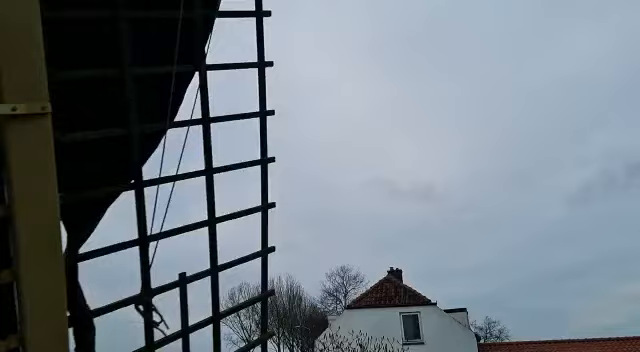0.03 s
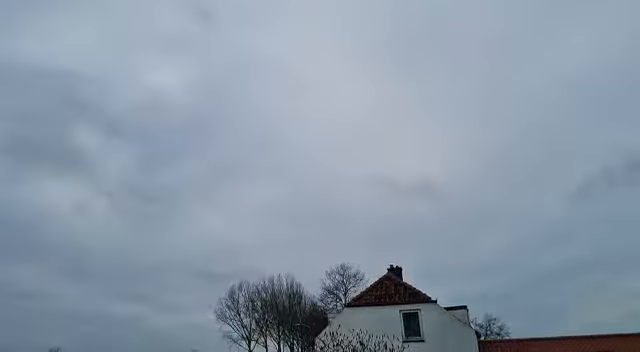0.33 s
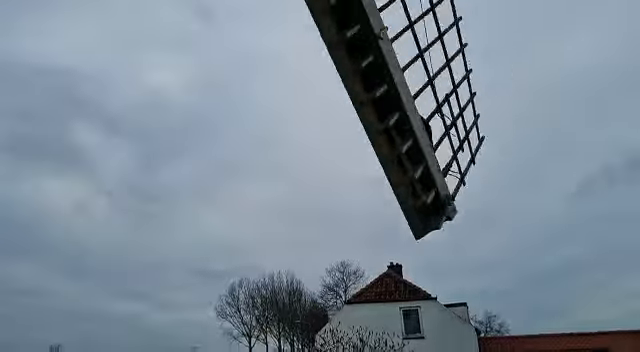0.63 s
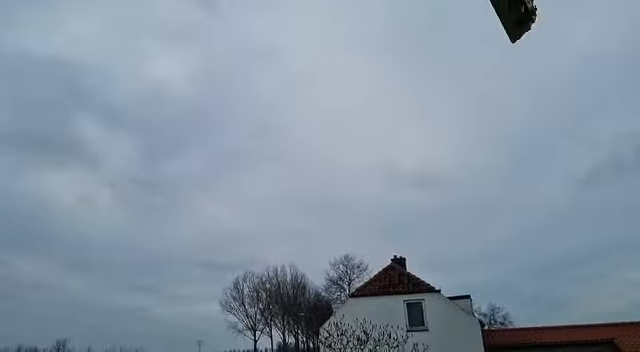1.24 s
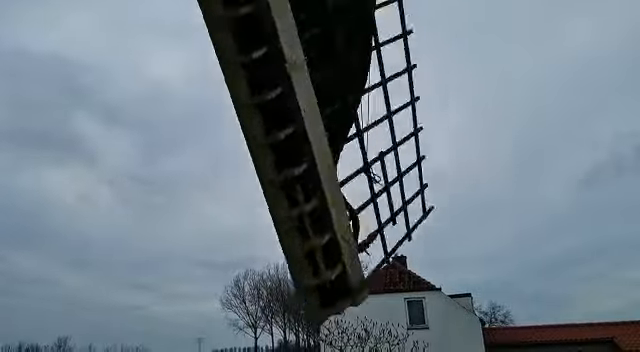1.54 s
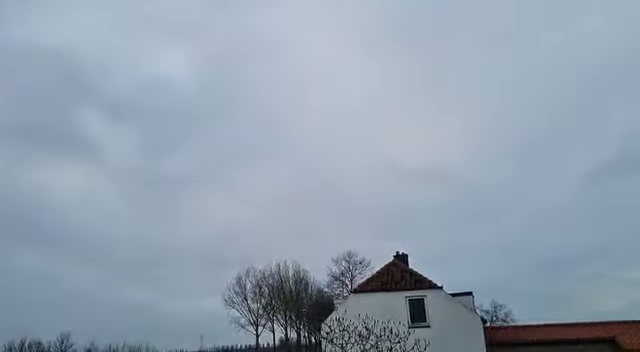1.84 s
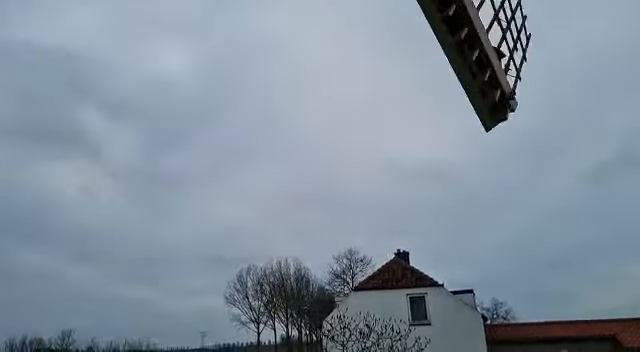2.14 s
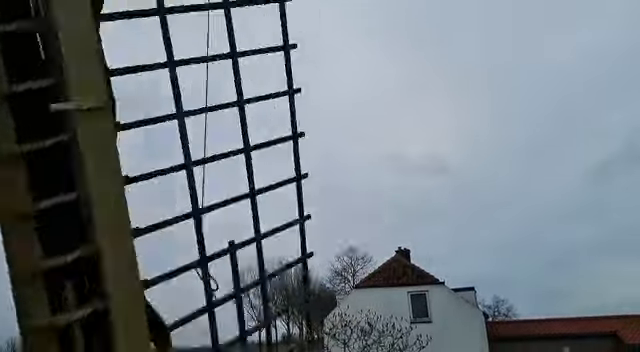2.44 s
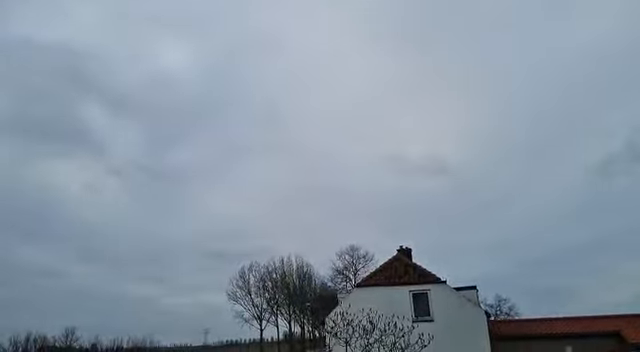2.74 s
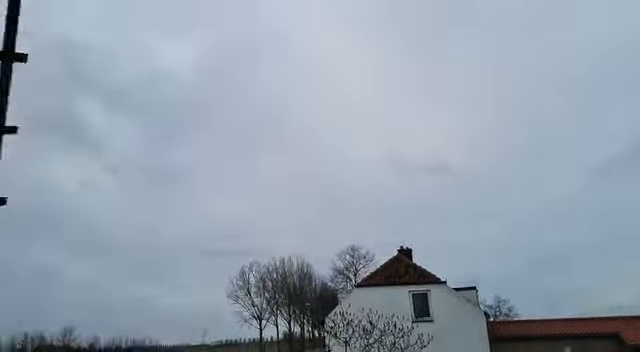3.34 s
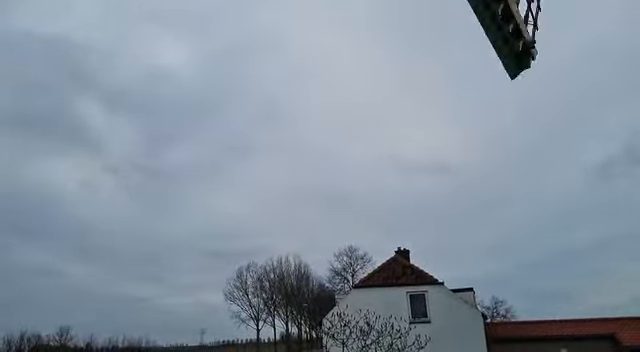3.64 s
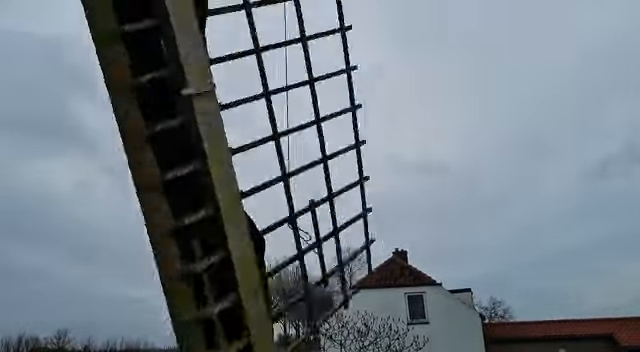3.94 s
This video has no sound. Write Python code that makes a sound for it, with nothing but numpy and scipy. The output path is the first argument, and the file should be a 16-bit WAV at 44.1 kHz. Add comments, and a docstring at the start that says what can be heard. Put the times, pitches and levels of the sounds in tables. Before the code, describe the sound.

After a brief silence, gusty wind hits the microphone at about 0.4 seconds, rumbling and fluttering with soft thumps and a slight crackle. From 1 second, windmill sails swish softly past roughly every 0.8 seconds over a thin hiss. The wind drops around 1.2 to 1.6 seconds, leaving a few faint ticks, then builds again, bumping hardest near 3 seconds and gusting on until 4.

```python
"""After 0.4 s of silence, gusty wind hits two microphone openings (ports) below a turning windmill.
A low rumble and a rough flutter follow the wind. Single swirls of air (eddies) break on the ports
as soft bumps and deep thumps, with a crackle on the hard early ones. From about 1 s, a sail swishes
past roughly every 0.8 s over a thin hiss of open air. A few faint ticks sound as the wind drops;
then it builds again, and bumps hardest around 3 s."""
import sys
import numpy as np
from scipy import signal
from scipy.fft import rfft, irfft
from scipy.io import wavfile
from scipy.ndimage import uniform_filter1d

SR = 44100
rng = np.random.default_rng(int(sys.argv[2]) if len(sys.argv) > 2 else 0)


def put_to_file(sound):
    """Save the sound as 16-bit audio at rate SR, in the file named by the first command-line argument."""
    columns = np.atleast_2d(sound).T  # one column per channel
    safe = np.clip(columns, -1, 1)
    whole_steps = np.round(safe * 32767)
    wavfile.write(sys.argv[1], SR, whole_steps.astype(np.int16))


N = 176400
TIME = np.arange(N) / SR

# Strength of the wind on the ports: t/s, rumble level/dB, flutter level/dB
GUSTS = [(0.45, -34.5, -36.5), (0.62, -28.5, -21.5), (0.8, -30, -45), (1.03, -33.5, -39),
         (1.17, -44.5, -49), (1.5, -50.5, -51.5), (1.72, -34.5, -38), (1.97, -40.5, -45), (2.07, -29, -33),
         (2.3, -31.5, -32), (2.5, -24, -24), (2.75, -30, -34), (3.05, -35, -35.5), (3.3, -29, -28),
         (3.4, -31.5, -34.5), (3.6, -40, -41.5), (3.82, -30.5, -29), (4.0, -27.5, -31)]
# Eddies breaking on the ports: t/s, level/dB, half-length/s, corner f/Hz, pan/dB (left minus right)
EDDY_BUMPS = [(0.468, -23.5, 0.0053, 435, 3.5), (0.509, -28.5, 0.017, 604, 4.5),
              (0.554, -26.5, 0.0068, 535, 13.5), (0.621, -16.5, 0.011, 580, 4.5),
              (0.646, -22.5, 0.005, 540, 0), (0.734, -31.5, 0.015, 580, 16.5),
              (.768, -22.5, 0.0054, 447, -0.5), (0.798, -19.5, .012, 390, 4),
              (0.836, -24.5, .009, 450, 5.5), (0.862, -27.5, 0.0082, 415, 2),
              (0.983, -36.5, 0.014, 533, 11.5), (1.005, -26.5, 0.007, 340, 1.5),
              (1.266, -35, 0.017, 222, 2.5), (1.417, -37.5, 0.018, 240, -0.5),
              (1.582, -35, 0.034, 244, -3.5), (1.736, -26.5, 0.011, 554, 2), (2.051, -32, 0.008, 255, -4),
              (2.095, -26, 0.01, 270, -5.5), (2.145, -25, 0.0085, 265, -1), (2.244, -24.5, 0.0035, 370, 13),
              (2.282, -32.5, 0.018, 667, 13), (2.384, -16, 0.0074, 420, 0), (2.461, -22.5, 0.007, 440, 3),
              (2.473, -15, 0.0068, 285, -2), (2.543, -20, 0.0055, 443, 2), (2.567, -21.5, 0.0085, 390, -1),
              (2.624, -27, 0.015, 330, -4), (2.694, -32.5, 0.0028, 505, 17.5),
              (2.792, -33.5, 0.0036, 480, 18), (2.827, -27.5, 0.004, 440, 5),
              (2.858, -13.5, 0.0073, 310, -1.5), (2.902, -23, 0.0084, 252, 1.5),
              (2.995, -15, 0.0064, 260, -3.5), (3.043, -22.5, 0.0054, 300, 12),
              (3.072, -12.5, 0.0094, 392, -1), (3.116, -14.5, 0.013, 350, 0.5),
              (3.16, -24, 0.016, 353, -2.5), (3.261, -17.5, 0.0052, 380, 2),
              (3.308, -24.5, 0.0054, 454, -5), (3.728, -25, 0.0058, 247, -2),
              (3.801, -26, 0.0051, 516, 13.5), (3.88, -32.5, 0.0061, 550, 15.5)]
# How the ports boost or weaken each frequency: f/Hz, level/dB
PORT_TONE = [(30, -6), (62, 6), (90, -1.5), (130, 1), (190, -3.5), (250, 2), (320, 0.35), (420, 0.77),
             (700, -1.5), (1200, -1.43), (2000, 0), (2800, 0.5), (4500, -7.5), (8500, -11.5)]
# How alike the wind is at the two ports: f/Hz, likeness (1 = the same, 0 = unrelated)
LIKENESS = [(60, -0.15), (200, 0.13), (600, 0.072), (2000, 0.042)]
# Moments when the bass drops out on the left: start t/s, end t/s, level change/dB
BASS_DIPS = [(0.417, 0.578, -29), (0.644, 0.78, -34), (0.796, 0.918, -37), (1.704, 1.807, -55),
             (2.237, 2.472, -31), (2.473, 2.624, -17), (2.67, 2.857, -20), (3.042, 3.168, -10.5),
             (3.786, 3.986, -15.5)]
# Thumps of the largest eddies: t/s, level/dB, pan/dB
DEEP_THUMPS = [(0.612, -17, 5.5), (0.781, -24.5, -16), (1.011, -27, -12), (2.214, -19.5, -5),
               (2.485, -26, -12), (2.64, -26, -4), (2.914, -25, 5), (2.997, -31, 1)]
# Crackle of hard eddies: t/s, level/dB, half-length/s
CRACKLE_BURSTS = [(0.52, -64, 0.024), (0.615, -50, 0.015), (0.727, -47.5, 0.011), (0.806, -47, 0.008)]
# Tone of the crackle and the snaps: f/Hz, level/dB
CRACKLE_TONE = [(1500, 10.5), (3000, 4), (6000, -12), (8500, -21), (15500, -19)]
# Single snaps within the crackle: t/s, level/dB
SHARP_SNAPS = [(.466, -53), (.487, -45), (.5, -51), (0.619, -41), (.71, -48), (0.766, -46), (0.863, -39)]
# Sails going by: t/s, hiss level/dB, swoosh level/dB, approach time/s
SAIL_PASSES = [(.95, -66.5, -60, .15), (1.79, -61.5, -56.5, 0.1), (2.52, -51, -53, 0.16),
               (3.335, -51.5, -46, 0.2), (4.0, -51, -51, 0.11)]
# Tone of the hiss through a sail's lattice: f/Hz, level/dB
SAIL_HISS_TONE = [(1500, 13), (3000, 4.5), (5000, -16), (7300, -4.5), (8300, -9.5), (9200, -8.5),
                  (11200, -2.5), (13000, -6.5), (15500, -10)]
# Tone of a sail's lower swoosh: f/Hz, level/dB
SWOOSH_TONE = [(600, 7), (1300, -2.5), (2000, -2.5), (2800, -1.5), (4000, -7), (5200, -6), (7200, -12.5),
               (8400, -27), (15500, -27.5)]
# Faint ticks and rustles: t/s, level/dB, decay time/s, top f/Hz
FAINT_TICKS = [(1.123, -48, 0.0061, 5000), (1.317, -54, 0.0099, 12000), (1.341, -57, 0.029, 12000),
               (1.387, -52.5, 0.021, 12000), (1.417, -57, 0.013, 12000), (1.453, -56, 0.014, 12000),
               (2.196, -39.5, 0.008, 4830), (3.595, -42.5, 0.008, 4470)]
# Tone of the ticks: f/Hz, level/dB
TICK_TONE = [(1500, 5), (3000, 2.5), (6500, -2.5), (8500, -13), (11500, -4), (15500, -21)]
# Strength of the open-air hiss: t/s, level/dB
AIR_STRENGTH = [(.45, -62), (1.1, -58), (1.22, -61), (1.32, -60), (1.6, -57), (2.0, -56), (2.28, -47.5),
                (2.8, -51.5), (4.0, -51.5)]
# Tone of the open-air hiss: f/Hz, level/dB
AIR_TONE = [(600, -1), (1300, -5), (1900, -10), (2700, -6.5), (3800, -13), (6500, -16), (7400, -19),
            (8200, -34), (9200, -28.5), (11200, -25), (15500, -39)]

RUMBLE_CORNER_HZ, FLUTTER_CORNER_HZ = 106.4, 321   # above its corner, a sound falls away
RUMBLE_LOW_HZ, BUFFET_LOW_HZ = 28, 129   # below these, the bass thins out
RUMBLE_TRIM_DB, FLUTTER_TRIM_DB, EDDY_TRIM_DB = -0.5, 0.23, -0.18
ROUGH_DB, SPURTS_PER_S = 3.5, 143   # the wind's treble comes in spurts
DIP_BELOW_HZ, DIP_FADE_S = 247, 0.049
CRACKLE_PAN_DB = 12


def wind():
    """Swirling air buffets the ports: rumble, flutter and eddies set the level of 22 noise bands."""
    edges = np.geomspace(20, 11000, 23)
    centres, widths = np.sqrt(edges[1:] * edges[:-1]), np.diff(edges)
    time = TIME[::40]   # coarse steps are enough for levels
    rumble_db, flutter_db = in_time(GUSTS, time)
    rumble = (pan(-1) * from_db(rumble_db + RUMBLE_TRIM_DB)) ** 2
    flutter = (pan(0.6) * from_db(flutter_db + FLUTTER_TRIM_DB)) ** 2
    rumble_share = turbulence(centres, widths, RUMBLE_CORNER_HZ, RUMBLE_LOW_HZ)
    flutter_share = turbulence(centres, widths, FLUTTER_CORNER_HZ, BUFFET_LOW_HZ)
    eddy_power = eddies(centres, widths, time)
    white = rng.standard_normal((2, 2, N))
    spurts = np.array([drift(SPURTS_PER_S), drift(SPURTS_PER_S)])
    out = 0
    for k, hz in enumerate(centres):
        left, right = np.sqrt(rumble_share[k] * rumble + flutter_share[k] * flutter + eddy_power[k])
        left = left * bass_dips(hz, time)
        gain = np.array([np.interp(TIME, time, side) for side in (left, right)])
        noise = port_noise(white[k % 2], at_hz(LIKENESS, hz), edges[k], edges[k + 1])
        rough = rms_one(from_db(ROUGH_DB * spurts * np.log2(1 + hz / 530) ** .5))   # rougher higher up
        out = out + from_db(at_hz(PORT_TONE, hz)) * gain * rough * noise
    return out


def turbulence(hz, widths, corner_hz, low_hz):
    """Share of the swirling air's power in each band: flat from low_hz to the corner, then falling."""
    steepness = 4.086 + np.clip(np.log2(448 / corner_hz), 0, 1)   # steeper for slow, soft eddies
    power = widths / (1 + (hz / corner_hz) ** steepness) / (1 + (low_hz / hz) ** 2)
    return power / power.sum()


def eddies(centres, widths, time):
    """Each eddy breaks on the ports as a short swell of power in every band."""
    power = np.zeros((len(centres), 2, len(time)))
    for s, db, width, corner_hz, pan_db in EDDY_BUMPS:
        share = turbulence(centres, widths, corner_hz, BUFFET_LOW_HZ)
        peak = (pan(pan_db) * from_db(db + EDDY_TRIM_DB)) ** 2
        for k, hz in enumerate(centres):
            stretch = (450 / hz) ** 0.041   # the bass lasts longer than the treble
            power[k] += share[k] * peak * bell(time, s, width * stretch, rise=0.79)
    return power


def port_noise(white, alike, low_hz, high_hz):
    """One band of wind noise, partly alike at the two ports, with its slow swings evened out."""
    shared, opposite = white
    pair = np.sqrt(1 + alike) * shared + np.sqrt(1 - alike) * opposite * [[1], [-1]]
    band_pass = signal.butter(3, [low_hz, high_hz], "band", fs=SR, output="sos")
    band = rms_one(signal.sosfilt(band_pass, pair))
    window = int(SR * max(2.86 / (high_hz - low_hz), .012))
    local_power = uniform_filter1d(band * band, window, axis=-1)
    return rms_one(band / np.sqrt(local_power + 0.15))


def bass_dips(hz, time):
    """A gain that makes the bass drop out briefly and leaves the treble alone."""
    dip_db = sum(db * np.clip(np.minimum(time - start, end - time) / DIP_FADE_S + .5, 0, 1)
                 for start, end, db in BASS_DIPS)
    return from_db(dip_db / (1 + (hz / DIP_BELOW_HZ) ** 8))


def thumps(hz=66.7, half_length_cycles=0.67):
    """A large eddy pushes and pulls the air for a swing or two, out of step at the two ports."""
    phases = rng.uniform(0, 2 * np.pi, (len(DEEP_THUMPS), 2, 1))
    out = 0
    for (s, db, pan_db), phase in zip(DEEP_THUMPS, phases):
        swing = np.sin(2 * np.pi * hz * (TIME - s) + phase)
        out = out + from_db(db) * pan(pan_db) * bell(TIME, s, half_length_cycles / hz) * swing
    return out


def crackle(clicks_per_s=900, spread_db=3.5):
    """Sharp random clicks of uneven size, mostly on the left, while a hard eddy lasts."""
    sizes = from_db(spread_db * np.minimum(rng.exponential(1, (2, N)), 3))
    signs = rng.choice([-1, 1], (2, N))
    clicks = (rng.random((2, N)) < clicks_per_s / SR) * sizes * signs
    level = np.sqrt(sum(from_db(db) ** 2 * bell(TIME, s, width) for s, db, width in CRACKLE_BURSTS))
    return pan(CRACKLE_PAN_DB) * level * coloured(clicks, CRACKLE_TONE)


def snaps(decay_s=0.0008):
    """The flow tears at the edge of one port: spikes about a millisecond long."""
    level = sum(from_db(db) * die_away(s, decay_s) for s, db in SHARP_SNAPS)
    return pan(CRACKLE_PAN_DB) * level * hiss(CRACKLE_TONE)


def sails(leave_s=0.085, swoosh_s=0.073):
    """Air rushes through each sail: a high hiss swells as it nears, a lower swoosh as it goes by."""
    hiss_power = swoosh_power = 0
    for s, hiss_db, swoosh_db, approach_s in SAIL_PASSES:
        hiss_power += from_db(hiss_db) ** 2 * bell(TIME, s, leave_s, rise=approach_s / leave_s)
        swoosh_power += from_db(swoosh_db) ** 2 * bell(TIME, s, swoosh_s)
    high = np.sqrt(hiss_power) * hiss(SAIL_HISS_TONE)
    low = np.sqrt(swoosh_power) * hiss(SWOOSH_TONE)
    return pan(-0.8) * (high + low)


def ticks():
    """Short dry bursts that start at once and die away, some duller than others."""
    noise, out = hiss(TICK_TONE), 0
    for s, db, decay_s, top_hz in FAINT_TICKS:
        dulled = signal.sosfilt(signal.butter(2, top_hz, fs=SR, output="sos"), noise)
        out = out + from_db(db) * die_away(s, decay_s) * dulled
    return out


def open_air():
    """A smooth hiss of wind in the surroundings."""
    db, = in_time(AIR_STRENGTH, TIME)
    return pan(-2.5) * from_db(db) * hiss(AIR_TONE)


def from_db(db):
    """Turn decibels into a gain to multiply by."""
    return 10 ** (np.asarray(db) / 20)


def rms_one(x):
    """Scale a signal so its average strength (rms) is 1."""
    return x / np.sqrt(np.mean(x ** 2) + 1e-20)


def pan(db):
    """Two gains that put the left side db decibels above the right."""
    return from_db(np.array([[.5], [-.5]]) * db)


def in_time(rows, time):
    """Join a table's points with straight lines over time."""
    s, *columns = np.transpose(rows)
    return [np.interp(time, s, column) for column in columns]


def at_hz(points, hz):
    """Read a table at any frequency, with octaves evenly spaced."""
    freqs, values = np.transpose(points)
    return np.interp(np.log(hz), np.log(freqs), values)


def bell(time, s, width, rise=1):
    """A smooth swell of height 1 around time s; rise scales the length of its first half."""
    return np.exp(-.5 * ((time - s) / np.where(time < s, width * rise, width)) ** 2)


def die_away(s, decay_s):
    """Jump to 1 at time s, then fade."""
    return (TIME >= s) * np.exp(-np.abs(TIME - s) / decay_s)


def drift(rate):
    """A smooth random wobble of size about 1; a higher rate makes it faster."""
    step, settle = 40, 2000
    memory = np.exp(-2 * np.pi * rate * step / SR)
    white = rng.standard_normal(N // step + settle + 2)
    slow = signal.lfilter([1], [1, -2 * memory, memory ** 2], white)[settle:]
    return np.interp(np.arange(N) / step, np.arange(len(slow)), rms_one(slow))


def coloured(x, tone):
    """Shape a signal with a tone table, falling away below its first point; rms 1."""
    hz = np.arange(1, N // 2 + 2) * SR / N
    gain = from_db(at_hz(tone, hz)) * np.minimum(hz / tone[0][0], 1) ** 2
    return rms_one(irfft(rfft(x) * gain, N))


def hiss(tone):
    """Stereo noise with the given tone."""
    return coloured(rng.standard_normal((2, N)), tone)


def scene():
    """Everything heard at the two ports."""
    return wind() + crackle() + sails() + open_air() + ticks() + thumps() + snaps()


def record(dry):
    """The sound fades in out of silence, and the highest treble is cut."""
    start_s, rise_s, cutoff_hz = 0.408, 0.027, 15900
    fade = np.clip((TIME - start_s) / rise_s, 0, 1) ** 2
    return signal.sosfilt(signal.ellip(10, .1, 90, cutoff_hz, fs=SR, output="sos"), dry * fade)


dry = scene()
out = record(dry)
put_to_file(out)
```